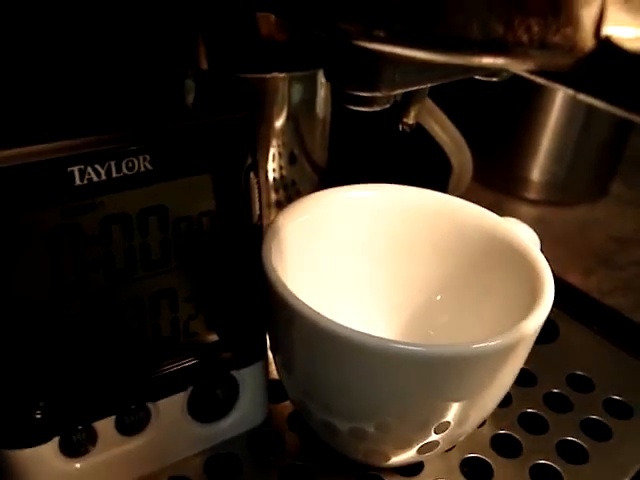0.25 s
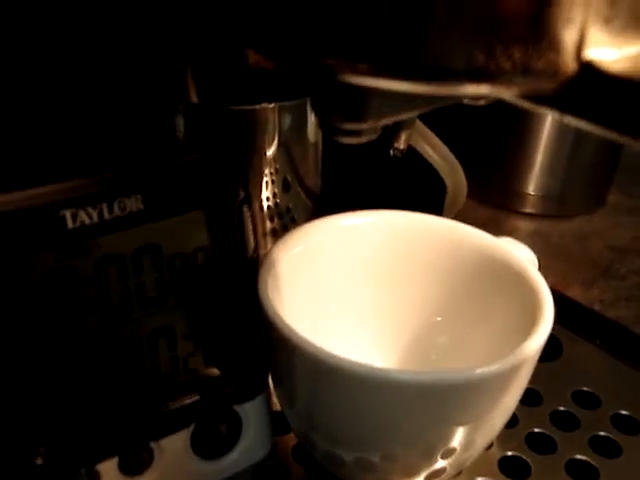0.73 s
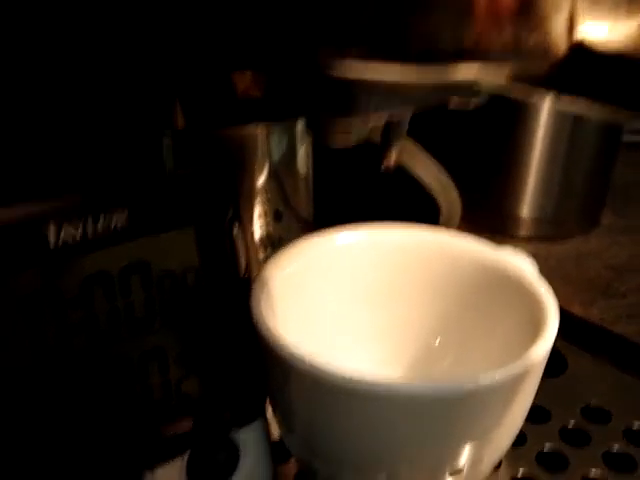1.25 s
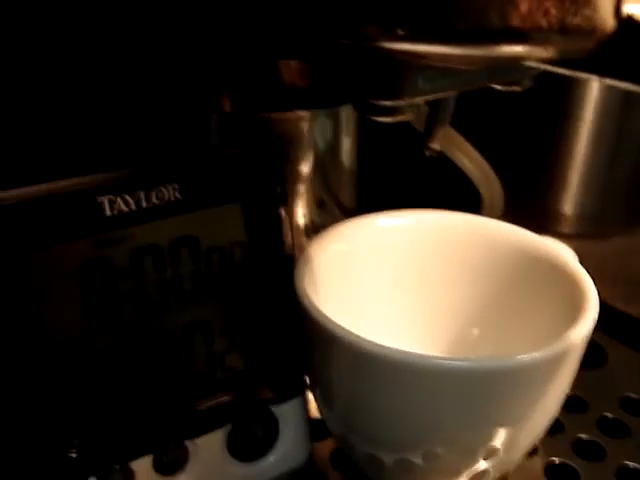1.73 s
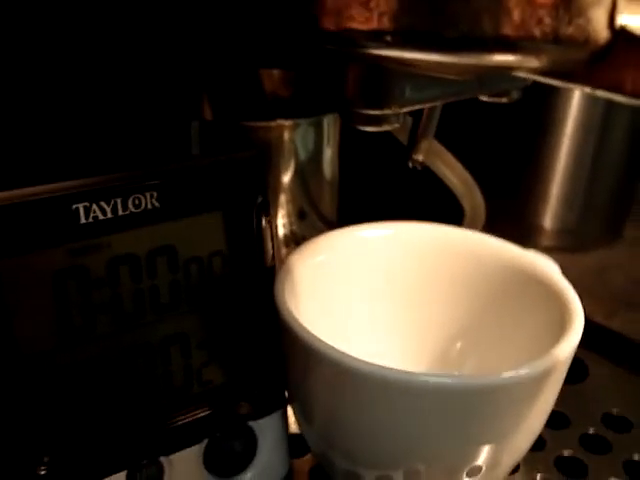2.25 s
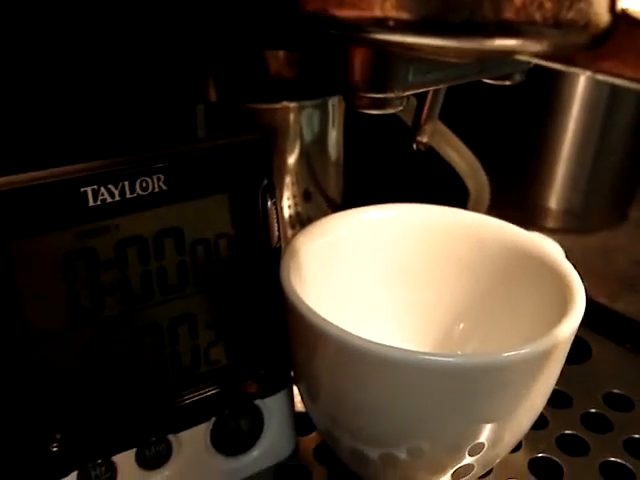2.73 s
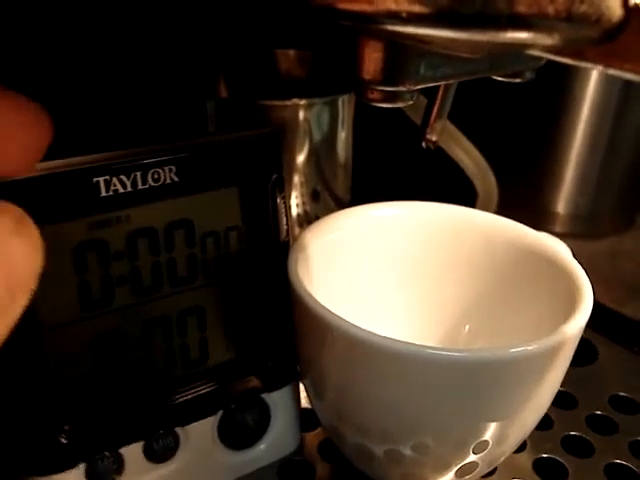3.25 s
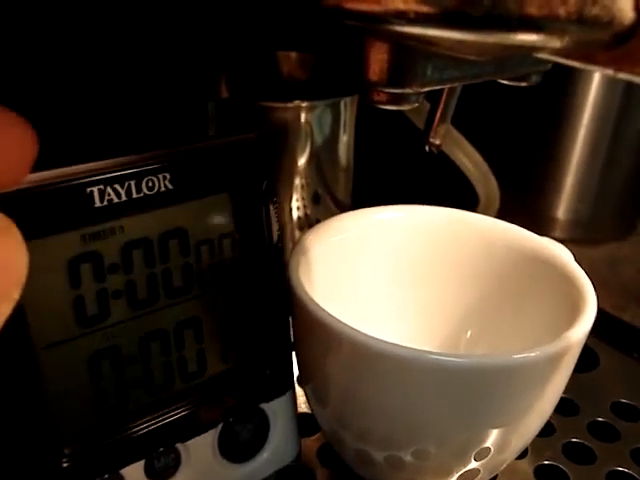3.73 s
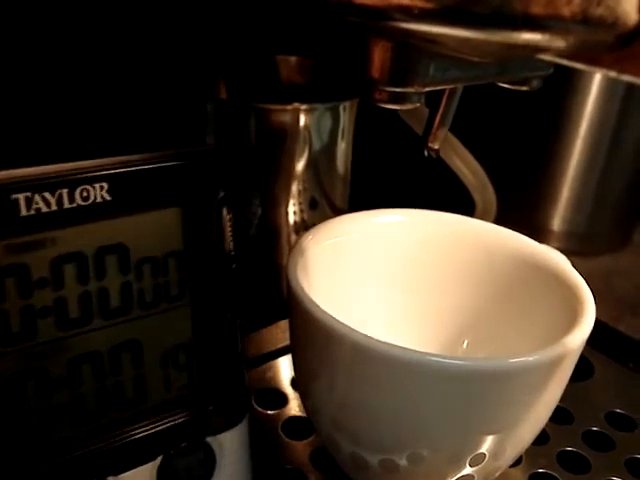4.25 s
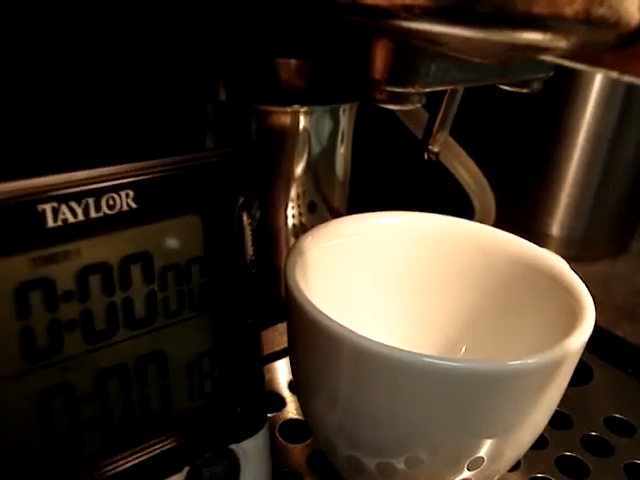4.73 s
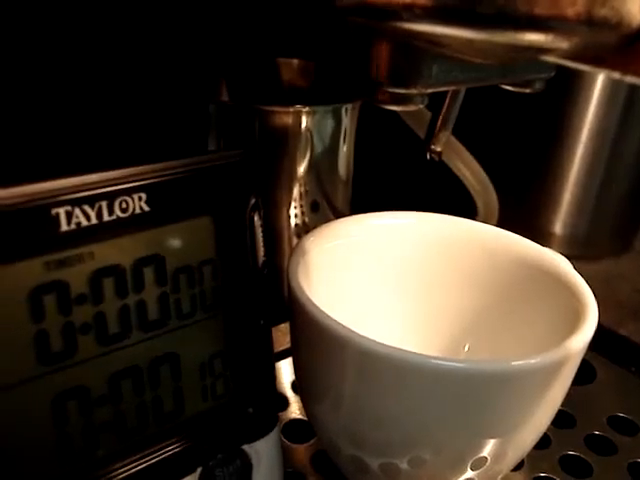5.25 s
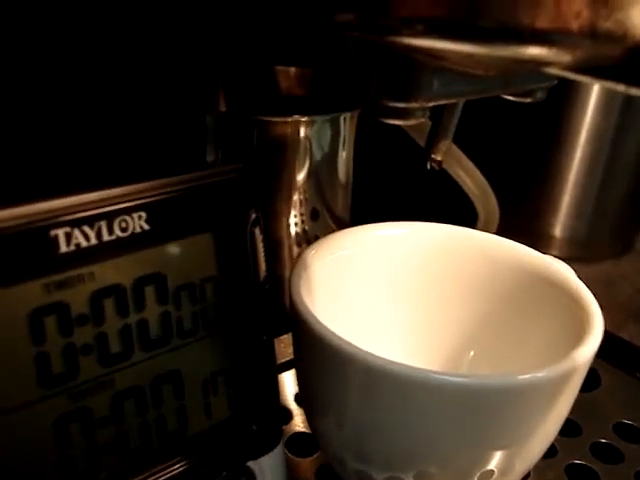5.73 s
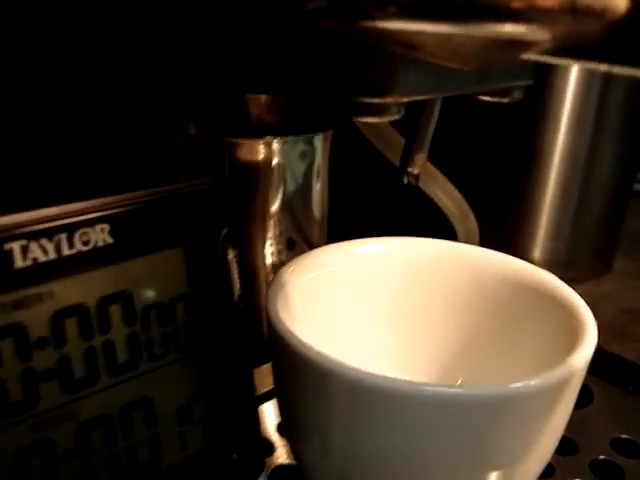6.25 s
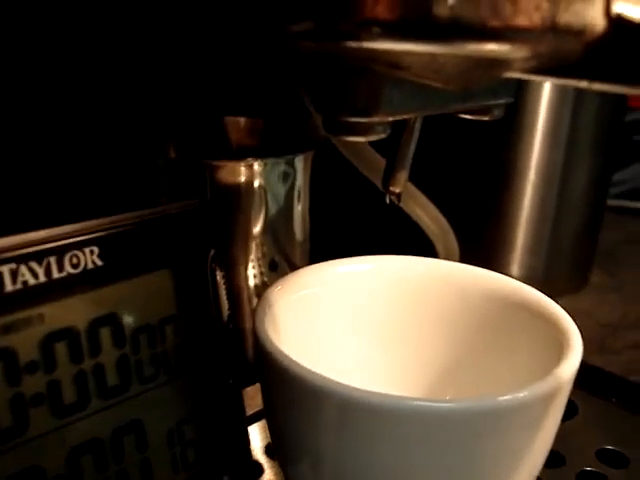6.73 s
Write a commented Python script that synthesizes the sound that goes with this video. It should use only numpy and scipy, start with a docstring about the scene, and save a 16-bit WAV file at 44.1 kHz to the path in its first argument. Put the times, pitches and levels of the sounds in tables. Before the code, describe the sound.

An espresso machine's vibrating pump buzzes throughout, close to a single microphone in a kitchen. It opens with a bright metallic rattle that stops at about 0.25 seconds with a soft low thud. The sound dips, then regains its force by about 0.9 seconds. From there the pump runs as a steady electric buzz with very fast dry ticking, while the case chatters and loose steel parts jingle and sizzle. The pitch holds, but different ringing overtones swell and fade as the panels vibrate. Between about 2.5 and 4 seconds the tone shifts and the rattle grows strongest, easing briefly just after 4 seconds. From about 5 seconds the rattle tightens and becomes more even and less bright. At about 6.1 seconds the ticking stops and the buzz drops to a quieter, settled hum, lasting until about 7 seconds. A faint room rumble lies behind it all.

```python
"""Espresso machine pump, close up

Kitchen, one microphone close to the machine. The vibrating pump buzzes at the mains rate: its piston
ticks and shakes the case, whose panels take turns singing on single overtones, and loose steel parts
rattle at every stroke. A bright opening rattle stops with a soft thud; as pressure builds the strokes
grow even, and near the end the buzz settles. Faint room rumble lies behind."""
import sys
import numpy as np
from scipy import signal
from scipy.fft import rfft, irfft, next_fast_len
from scipy.io import wavfile
from scipy.ndimage import uniform_filter1d, map_coordinates

SR = 44100
rng = np.random.default_rng(int(sys.argv[2]) if len(sys.argv) > 2 else 0)


def store_wav(level_fs):
    """Save 16-bit WAV to argv[1]."""
    pcm = np.round(np.clip(np.atleast_2d(level_fs), -1, 1) * 32767)
    wavfile.write(sys.argv[1], SR, pcm.T.astype(np.int16))


N = 308259
TIME = np.arange(N) / SR

MAINS_HZ = 60.02  # one stroke per mains cycle
STRIKE_SHARE, STRIKE_DELAY = .12, .14  # piston's place in the cycle, and its delay at full pressure
THUD_S, CATCH_S, RECOVER_S = .243, 0.012, 0.61  # thud; the pump catches the water, then regains force
TIGHTEN_S = 4.94  # from here the load presses the loose parts down
SETTLE_S, SETTLE_TAKES_S = 6.11, 0.027  # the buzz drops to a settled hum

# Pump pressure over the shot: t/s, pressure/0-1
PRESSURE = [(0, 0.01), (1.9, 0), (2.6, 0.06), (3.6, 0.63), (4.2, 0.76), (7, 0.98)]
# Free play of the loose parts, setting how hard and how unevenly they land: t/s, play/0-1
PLAY = [(0, 0.87), (1.05, 0.66), (1.35, 0.63), (1.55, 0.57), (1.88, 0.7), (2.2, 0.58), (2.72, 0.85),
        (2.95, 0.71), (3.25, 0.91), (3.92, 0.97), (4.15, 0.31), (4.7, 0.74), (4.9, 0.48), (5.15, 0.76),
        (6.1, 0.53), (6.99, 0.17)]
# Contacts within one stroke: place/cycles, low-pressure level/dB, full-pressure level/dB
CONTACTS = [(.03, -1, 3.5), (0.131, 0.5, -6.5), (.23, 3, -0.5), (.35, 0, 3), (0.459, 2.5, 0.5),
            (.6, -4, 1.5), (0.801, 1, 0.5), (.9, -1.5, 2)]


def buzz(knock_hz=780, wander_db=2):
    """Overtones of the pump stroke in the case; pressure shifts their balance, and panels lift a few."""
    # f/mains rate, base level/dB at low pressure, base level/dB at full pressure
    overtones = [(1, -61, -55.5), (2, -79, -50), (3.02, -58, -54.5), (4, -67.5, -62.5), (5, -48, -46),
                 (6, -46, -49), (7, -53, -45.5), (8, -44, -42), (9, -43.5, -47.5), (10.2, -42.5, -41),
                 (11, -42.5, -48.5), (12, -51, -43.5), (13, -58, -41), (14.1, -34, -41), (15.1, -34.5, -26),
                 (16, -35.5, -31), (17, -44, -37.5), (18, -31, -27.5), (19, -41, -30.5), (20, -54, -40.5),
                 (21, -34, -32.5), (22, -48, -36), (23, -43.5, -40), (24, -51, -43), (25, -39, -37),
                 (26, -41, -43.5), (27, -38.5, -37), (28, -45, -32), (29, -41, -27.5), (30, -50.5, -39),
                 (32, -46, -33.5), (33, -32.5, -38.5), (34, -33.5, -31), (35, -33, -32.5), (36, -44.5, -50),
                 (37, -36, -48.5), (38, -41, -39), (41, -38.5, -50)]
    pressure = curve(PRESSURE)
    knock_db = shot_level(db=0, priming_db=-9.5, dip_db=-8.5, play_db=-1, tighten_db=-1, settle_db=-3)
    out = np.zeros(N)
    for order, low_db, full_db in overtones:
        # low overtones come from the smooth swing, high ones from the knock
        knock_share = 1 / (1 + (knock_hz / (order * MAINS_HZ)) ** 6)
        db = low_db + pressure * (full_db - low_db)
        db = db + knock_share * (knock_db + wander_db * wobble(1.454))
        db = 10 * np.log10(amp(db) ** 2 + panel_power(round(order)))
        out += overtone(round(order), db, pressure)
    return out


def overtone(order, db, pressure, waver_db=1.6):
    """One wavering line of the buzz; the pattern of contacts sets its phase."""
    hz = order * MAINS_HZ
    share, low_db, full_db = np.transpose(CONTACTS)
    low, full = amp([low_db, full_db]) @ np.exp(-2j * np.pi * order * share)
    contact_phase = np.angle(low) + pressure * np.angle(full / low)
    spread = 2 * np.pi * (hz / 1400) ** 2  # the case spreads the overtones in time, the high ones most, softening the peaks
    drift = hz / 1000 * (.3 * wobble(2) + .1 * wobble(9))
    phase = 2 * np.pi * hz * TIME + contact_phase + spread + drift
    return amp(db + waver_db * wobble(7)) * np.sqrt(2) * np.cos(phase)


def panel_power(order, fade_s=0.19):
    """Power added to one overtone as a panel seats, sings on it and lets go."""
    # Singing panels: start t/s, length/s, overtone order, level/dB
    panels = [(-.05, 0.21, 16, -28.5), (0.257, 0.11, 18, -28), (.4, 3.5, 3, -51), (.65, 1.3, 14, -32.5),
              (.7, 5.8, 41, -41), (.85, 2.72, 8, -35.5), (0.896, 1.88, 18, -27.5), (.92, 6.3, 5, -43),
              (1.2, .9, 35, -33), (1.8, 1.09, 15, -28.5), (1.947, 5.15, 4, -49.5), (1.98, 0.66, 28, -31.5),
              (2.025, 1.33, 29, -26), (2.7, 1.55, 16, -30), (2.946, 1.18, 19, -26.5), (3.45, 1.1, 9, -34.5),
              (3.554, 2.54, 26, -30), (3.778, 1.65, 15, -23.5), (3.8, 0.74, 18, -24.5),
              (4.75, 1.05, 29, -25.5), (5.2, .35, 35, -25), (5.68, 0.37, 15, -21.5), (6.06, 1.1, 8, -36)]
    power = np.zeros(N)
    for start, length, sung_order, db in panels:
        if round(sung_order) == order:
            onset = start - fade_s / 2
            swell = ramp(onset, fade_s) - ramp(onset + length, fade_s)
            power += (amp(db) * swell) ** 2
    return power


def case_chatter(scatter_s=0.000411, flutter_db=1.46, pressed_db=-2):
    """No two strokes hit the case alike: the uneven part rings between the overtones."""
    # Spectrum of the case: f/Hz, relative level/dB
    case_colour = [(60, -47.5), (130, -30.5), (230, -31), (330, -20), (430, -27), (520, -18.5), (740, -22),
                   (890, -6), (1080, -4), (1200, -12), (1400, -14.5), (1720, -2.5), (1860, -11.5),
                   (2060, -4.5), (2400, -11), (3200, -41.5)]
    times, sizes = contacts()
    knocks = pulses(times + rng.normal(0, scatter_s, len(times)), sizes * rng.choice([-1, 1], len(times)))
    case = coloured(echoing(knocks, ring_t60=0.013, room_t60=0.16, room_db=-10), case_colour)
    level_db = shot_level(db=-25.5, priming_db=-1, dip_db=-8.5, play_db=9.5, tighten_db=1, settle_db=-7.5)
    level_db += pressed_db * curve(PRESSURE) ** 2  # the strokes grow even under pressure
    return amp(level_db + flutter_db * wobble(24)) * case


def rattle(flicker_db=1.33):
    """The loose steel, heard in three bands: clatter, jingle and sizzle."""
    # Spectra of the bands, lowest first: f/Hz, relative level/dB
    clatter_colour = [(1500, -37), (2150, -10), (2380, 0.5), (2750, 4), (3050, -1), (3750, -3), (4300, -55)]
    jingle_colour = [(3400, -36), (3900, 5.5), (5000, 2), (5350, 2), (6000, -46)]
    sizzle_colour = [(4700, -42), (5450, 6.5), (6950, 6.5), (7200, 5), (8000, 4), (8600, -3), (10100, -6)]
    steel = steel_ring(landings())
    clatter_db = shot_level(db=-25.5, priming_db=-1, dip_db=-6, play_db=2.5,
                            tighten_db=-6.5, settle_db=-4.5)
    jingle_db = shot_level(db=-31.5, priming_db=-1, dip_db=-8.5, play_db=3, tighten_db=-3, settle_db=-3.5)
    sizzle_db = shot_level(db=-32, priming_db=2.5, dip_db=-8.5, play_db=4, tighten_db=-9, settle_db=-4.5)
    sizzle_db += flicker_db * wobble(22)  # the highest sizzle flickers slightly in level
    clatter = amp(clatter_db) * coloured(steel, clatter_colour)
    jingle = amp(jingle_db) * coloured(steel, jingle_colour)
    sizzle = amp(sizzle_db) * coloured(steel, sizzle_colour)
    return clatter + jingle + sizzle


def landings(tight_s=.000018, slack_s=.000085, pressed_share=0.58, scatter_db=3, hardness=1.16):
    """Steel parts land at every stroke: loosely timed they hiss, tightly timed they buzz."""
    times, sizes = contacts()
    scatter_s = tight_s * (slack_s / tight_s) ** curve(PLAY, times)
    scatter_s *= pressed_share ** curve(PRESSURE, times)  # pressure steadies the timing
    late, force = rng.standard_normal((2, len(times)))
    blows = sizes ** hardness * amp(scatter_db * force)  # hard contacts carry most of the treble
    return echoing(pulses(times + scatter_s * late, blows), ring_t60=0.02, room_t60=0.53, room_db=-3)


def steel_ring(hits, swell_db=2, shake_db=1):
    """The struck parts ring; pressure changes which ring most, and each comes and goes."""
    # Resonances: f/Hz, width/Hz, low-pressure gain/dB, full-pressure gain/dB
    steel_modes = [(2476, 56, 2.5, -12.5), (2784, 35, -4.5, -28), (3076, 39, -4.5, -3.5),
                   (3440, 180, -0.5, 2), (3700, 130, -28.5, 1), (4204, 47, -4.5, 7), (4714, 220, 8.5, -4),
                   (6024, 120, 4, -1.5), (6520, 120, 8, -8.5), (8300, 46, 10.5, 4.5), (9250, 130, 10, 2.5)]
    pressure = curve(PRESSURE)
    steel = hits
    for hz, width, low_db, full_db in steel_modes:
        ring = filtered(hits, lambda f: 1j * f * width / (hz * hz - f * f + 1j * f * width))
        ring_db = low_db + pressure * (full_db - low_db) + swell_db * wobble(4.18)
        steel = steel + amp(ring_db) * ring
    shake = np.sin(2 * np.pi * (MAINS_HZ * TIME - STRIKE_DELAY * pressure))  # peaks just after the strike
    return steel * amp(shake_db * shake)


def contacts(creep_s=0.0001604, creep_rate=1.6):
    """Times and sizes of the contacts of every stroke; pressure shifts which land hardest."""
    share, low_db, full_db = np.transpose(CONTACTS)
    strokes = np.arange(int(TIME[-1] * MAINS_HZ) + 1)
    times = (strokes[:, None] + share) / MAINS_HZ
    # each part shifts slowly in its seat, so the bright overtones keep trading places
    times += creep_s * np.transpose([np.interp(t, TIME, wobble(creep_rate)) for t in times.T])
    sizes = amp(low_db + curve(PRESSURE, times) * (full_db - low_db))
    return times.ravel(), sizes.ravel()


def piston(db=-40, scatter_db=3.5):
    """The piston hits its stop once a cycle with a dry tick, from the thud until the hum settles."""
    # Spectrum of the tick: f/Hz, relative level/dB
    tick_colour = [(2200, -27), (3200, -4.5), (4200, -2.5), (5200, -8), (7000, -14.5), (10000, -29)]
    strokes = np.arange(int(TIME[-1] * MAINS_HZ) + 1)
    pressure = curve(PRESSURE, strokes / MAINS_HZ)
    times = (strokes + STRIKE_SHARE + STRIKE_DELAY * pressure) / MAINS_HZ
    ticks = pulses(times, amp(scatter_db * rng.standard_normal(len(times))))
    ticks = echoing(ticks, ring_t60=0.0037, room_t60=0.11, room_db=-2)
    striking = ramp(THUD_S, RECOVER_S) * (1 - ramp(SETTLE_S, SETTLE_TAKES_S))
    return amp(db) * striking * coloured(ticks, tick_colour)


def thud(hz=148, db=-40, t60=0.23):
    """A soft low thud as the first rattle stops."""
    age = np.maximum(TIME - THUD_S, 0)
    return amp(db - 60 * age / t60) * np.sin(2 * np.pi * hz * age)


def room_tone(db=-57, wander_db=1.5):
    """Faint kitchen rumble behind the machine."""
    # Spectrum of the room: f/Hz, relative level/dB
    kitchen_colour = [(20, 1.5), (45, -4), (90, -5.5), (150, -1), (400, -2.5), (2000, -26.5), (10000, -30)]
    return amp(db + wander_db * wobble(4.2)) * coloured(rng.standard_normal(N), kitchen_colour)


def shot_level(db, priming_db, dip_db, play_db, tighten_db, settle_db):
    """Level in dB: priming, a dip as the pump catches, a run following the play, tightening, settling."""
    caught = ramp(THUD_S, CATCH_S)
    start = priming_db * (1 - caught) + dip_db * caught * (1 - ramp(THUD_S, RECOVER_S))
    tightening = tighten_db * ramp(TIGHTEN_S, SETTLE_S - TIGHTEN_S)
    settling = settle_db * ramp(SETTLE_S, SETTLE_TAKES_S)
    return db + start + play_db * (curve(PLAY) - .5) + tightening + settling


def echoing(x, ring_t60, room_t60, room_db):
    """Each contact rings briefly in the metal and longer in the kitchen, keeping its broad colour."""
    t = np.arange(SR // 3) / SR
    ring = unit(rng.standard_normal(len(t)) * amp(-60 * t / ring_t60))
    room = unit(rng.standard_normal(len(t)) * amp(-60 * t / room_t60))
    response = rfft(ring + amp(room_db) * room, 2 * SR)
    response /= np.sqrt(uniform_filter1d(np.abs(response) ** 2, size=300))  # flatten the spectrum
    return signal.fftconvolve(x, irfft(response)[:len(t)])[:N]


def pulses(times, sizes):
    """Clicks placed between samples as windowed sincs."""
    at = times[:, None] * SR
    taps = np.floor(at).astype(int) + np.arange(-7, 9)
    shape = np.sinc(taps - at) * np.cos(np.pi * (taps - at) / 16) ** 2
    return np.bincount(np.clip(taps, 0, N).ravel(), (sizes[:, None] * shape).ravel(), N + 1)[:N]


def coloured(x, points):
    """x shaped by (f/Hz, level/dB) points, at rms 1."""
    f, db = np.transpose(points)
    return unit(filtered(x, lambda hz: amp(np.interp(np.log(hz + 1), np.log(f), db))))


def filtered(x, response):
    """x through a frequency response."""
    size = next_fast_len(N + SR // 2)
    return irfft(rfft(x, size) * response(np.fft.rfftfreq(size, 1 / SR)), size)[:N]


def curve(rows, times=TIME):
    """(t/s, value) rows interpolated at the given times."""
    return np.interp(times, *np.transpose(rows))


def wobble(rate):
    """A smooth random curve, rate knots a second."""
    knots = rng.standard_normal(int(TIME[-1] * rate) + 4)
    coarse = TIME[::64]
    return np.interp(TIME, coarse, map_coordinates(knots, [coarse * rate]))


def ramp(start_s, length_s):
    """Rises from 0 to 1, then holds."""
    return np.clip((TIME - start_s) / length_s, 0, 1)


def amp(db):
    """Decibels to gain."""
    return 10 ** (np.asarray(db) / 20)


def unit(x):
    """x at rms 1."""
    return x / np.sqrt(np.mean(x ** 2) + 1e-20)


def scene():
    """The machine up close, the kitchen behind it, in mono."""
    kitchen = room_tone()
    return (buzz() + piston() + case_chatter() + rattle() + thud() + kitchen)[None]


def record(dry, top_hz=10080):
    """The microphone channel passes nothing above its band limit."""
    return filtered(dry[0], lambda hz: hz < top_hz)[None]


dry = scene()
out = record(dry)
store_wav(out)
```